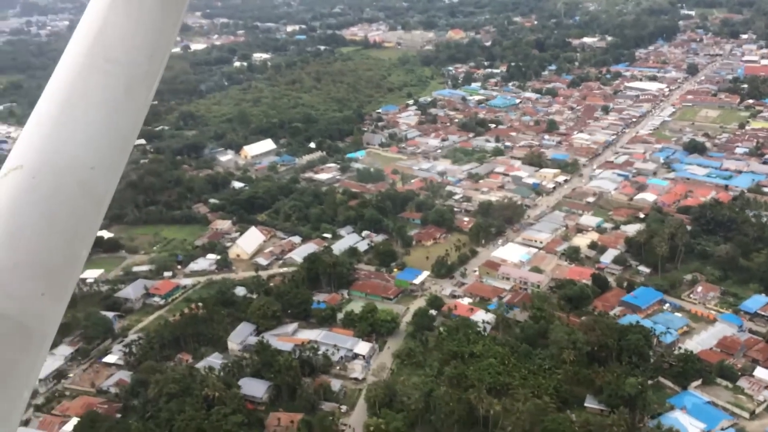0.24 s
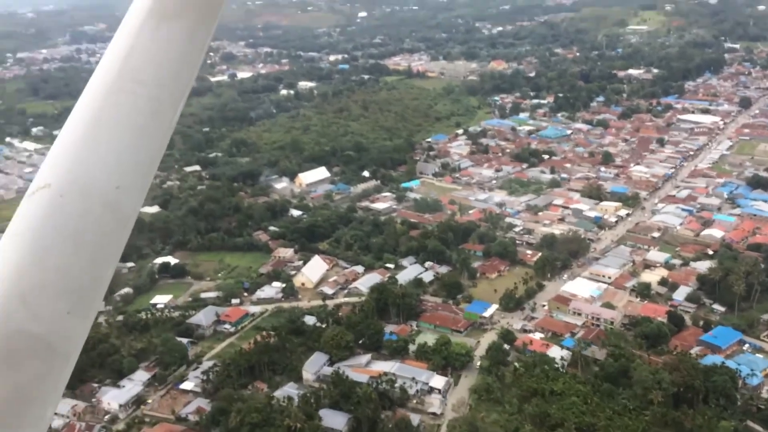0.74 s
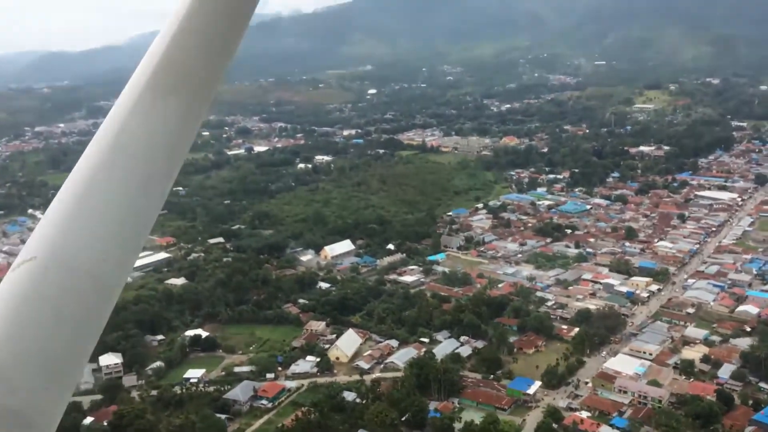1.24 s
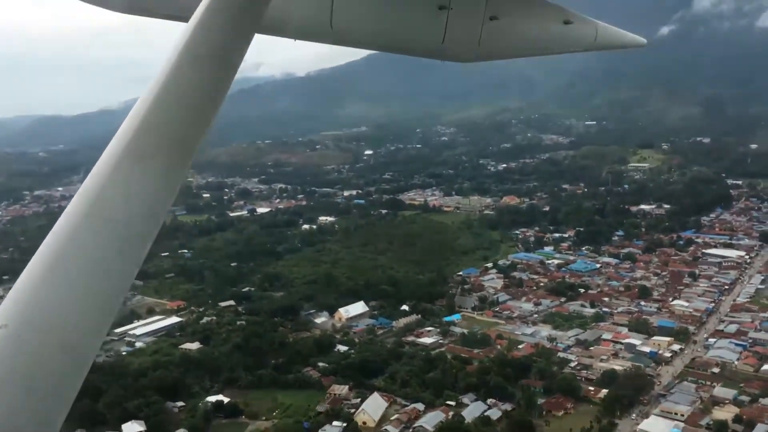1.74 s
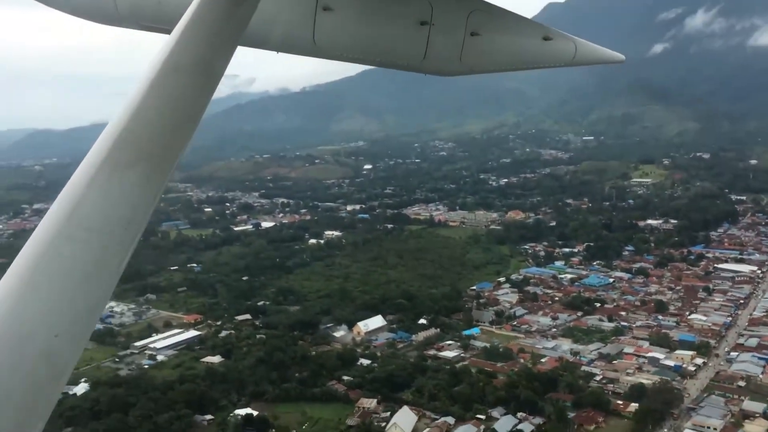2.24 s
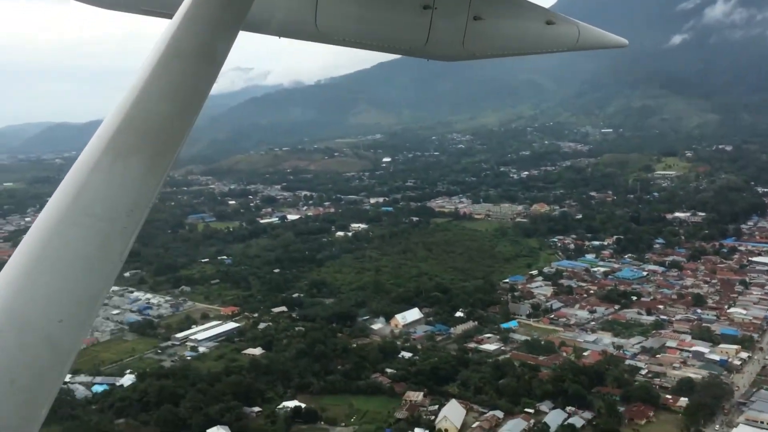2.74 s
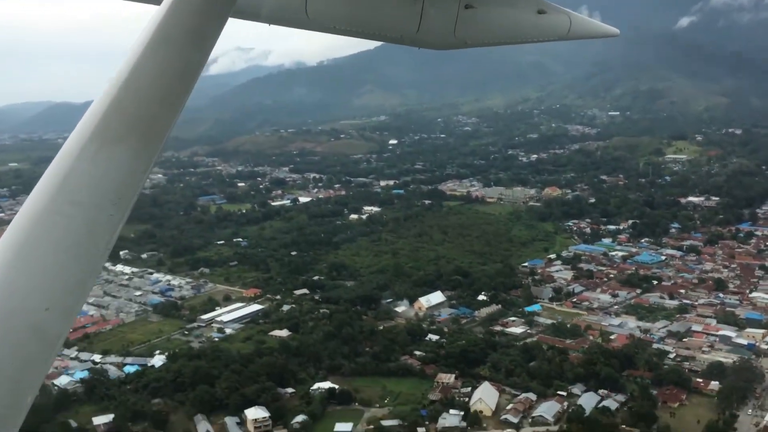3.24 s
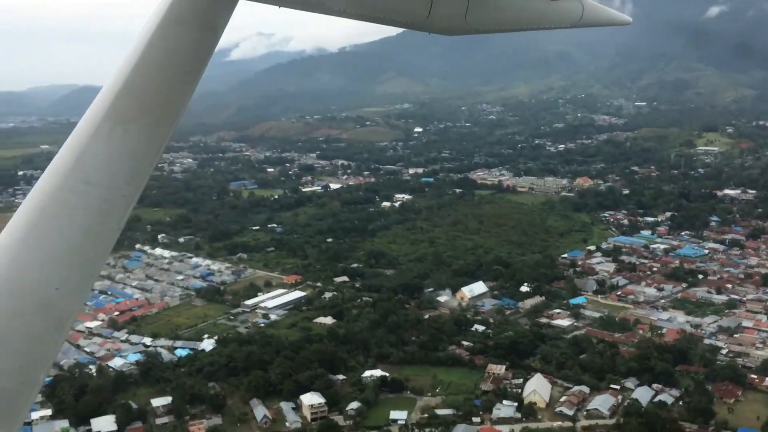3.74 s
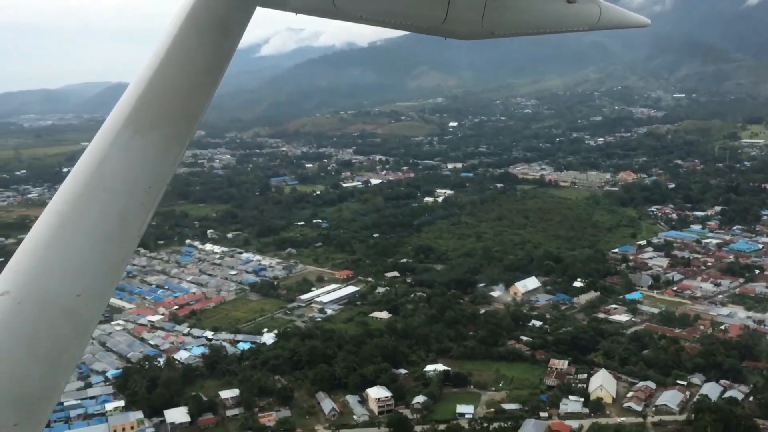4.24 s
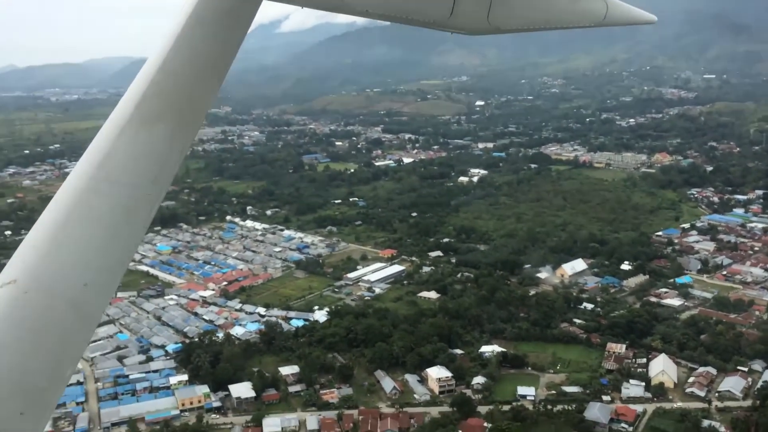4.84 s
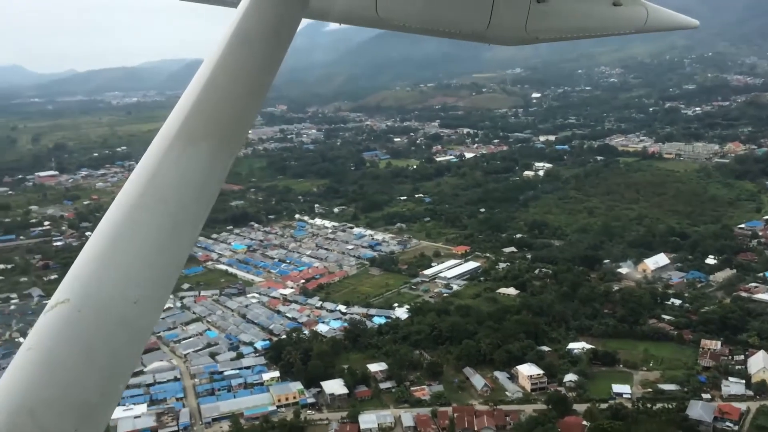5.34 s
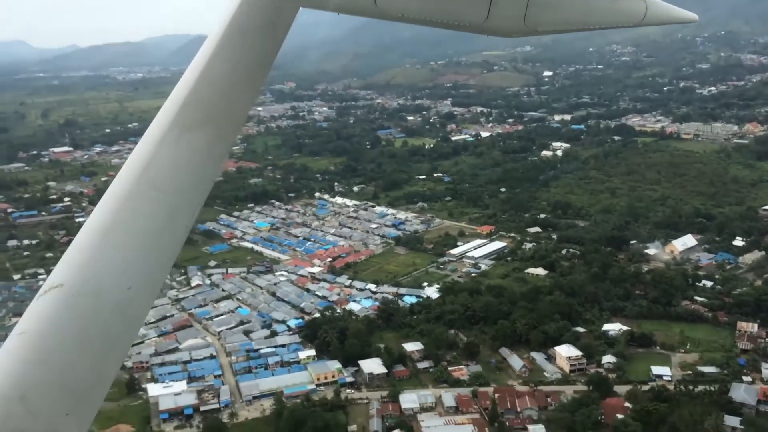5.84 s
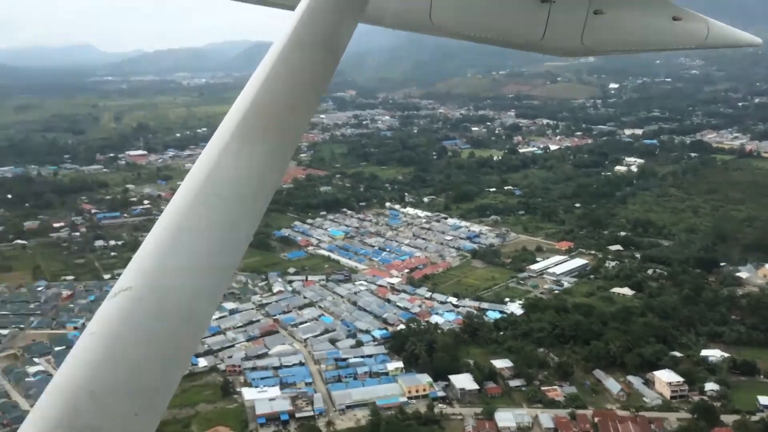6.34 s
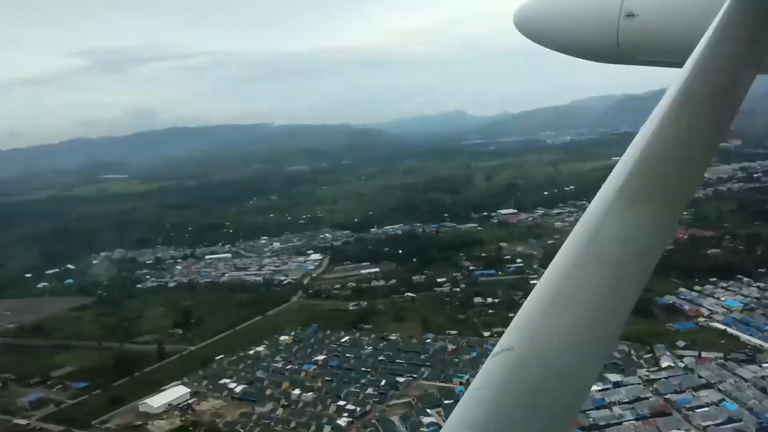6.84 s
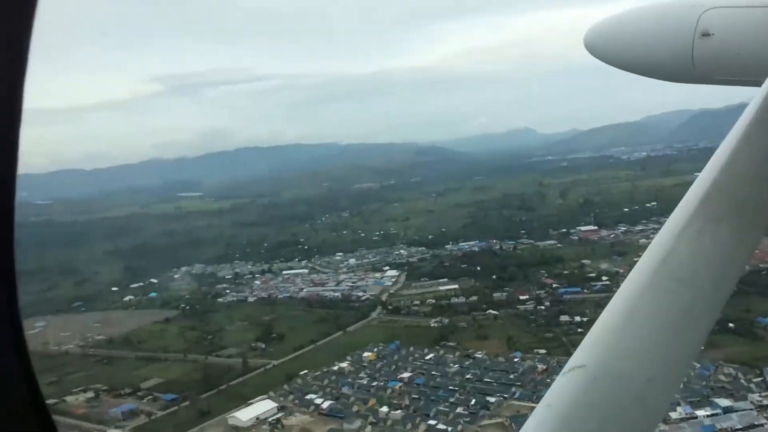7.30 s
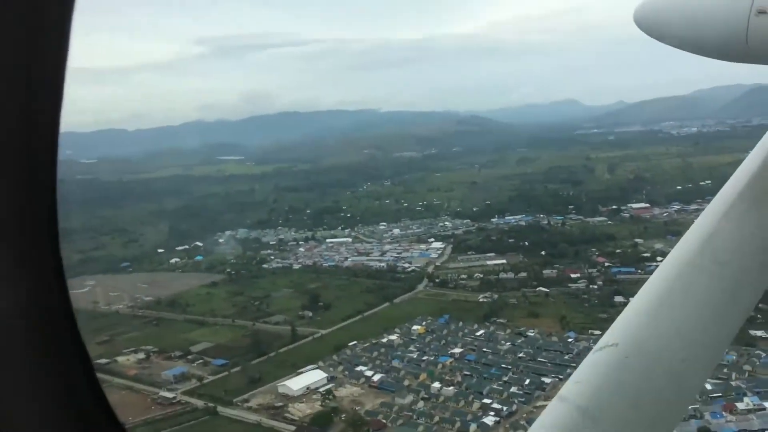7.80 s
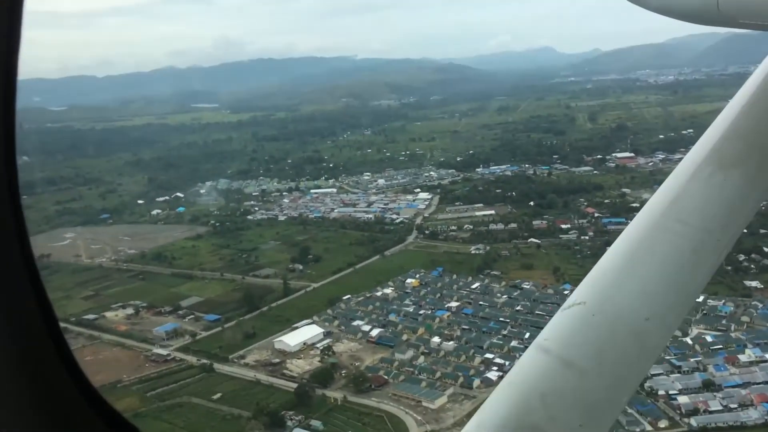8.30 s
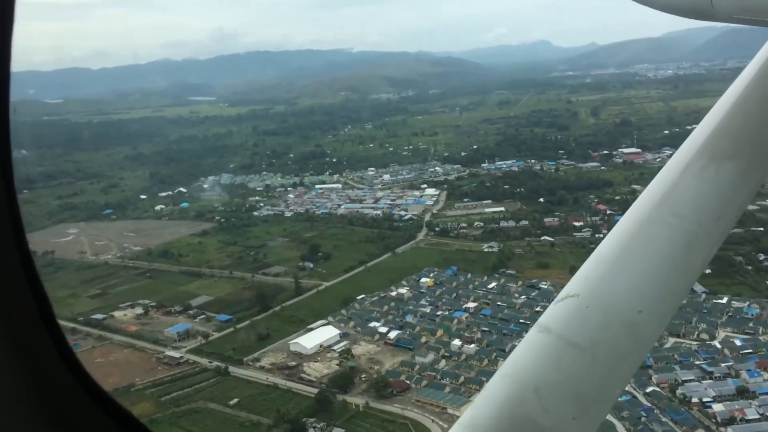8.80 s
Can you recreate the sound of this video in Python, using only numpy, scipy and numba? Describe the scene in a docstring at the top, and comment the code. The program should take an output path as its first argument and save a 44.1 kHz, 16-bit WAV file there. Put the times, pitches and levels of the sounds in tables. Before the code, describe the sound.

The cabin of a small turboprop in flight, loud and continuous from the first instant to the end at about 9 s. A deep propeller drone dominates, strongest near 100 and 200 Hz, with weaker tones around it making a rough, fluttering throb at nearly constant pitch. Dense slipstream roar fills the space, heavy in the bass and softer above. A wavering hum near 330 Hz sits inside it, and a very thin whine near 9.5 kHz flickers in and out. The 200 Hz note dips around 3, 5.3 and 8 s; the lowest strong tone eases between 4.3 and 5.5 s, with a slight swell of air noise at 5.4 s. From 5.7 s the hum fades. Around 6.6 s the phone turns forward: the roar grows brighter, and a faint narrow hiss near 8 kHz enters, slipping lower at 7.6 s. Close mono phone sound, peaks limited.

```python
"""A three-blade propeller drones in a turboprop cabin: sines on multiples of a nearly steady shaft rate.
Slipstream roars through the wall as noise shaped by resonances, and its colour changes as the phone,
held at a side window, turns mostly forward late on. A hum wanders near the tenth order and fades, a turbine
whine flickers high up, and a narrow band of hiss sings late on. The phone's limiter catches the peaks."""
import sys
import numpy as np
from scipy import signal
from scipy.fft import rfft, irfft, next_fast_len
from scipy.io import wavfile
from scipy.ndimage import uniform_filter1d, minimum_filter1d
from numba import njit

SR = 44100
rng = np.random.default_rng(int(sys.argv[2]) if len(sys.argv) > 2 else 0)


def wav_out(sig):
    """Save sig, one row per channel (or a flat mono array), as 16-bit PCM at SR to the path in sys.argv[1]."""
    wavfile.write(sys.argv[1], SR, np.round(np.clip(np.atleast_2d(sig).T, -1, 1) * 32767).astype(np.int16))


N = 399546
TIME_S = np.arange(N) / SR

# All levels are ahead of the phone's drive and limiter; tones are rms.
# slipstream colour through the cabin wall, before lifts and dips: [f/Hz, density/dB per Hz]
WALL_COLOUR = [(15, -71), (30, -50), (62, -37.5), (100, -33), (170, -34), (260, -41.5), (400, -50.5),
               (550, -59), (900, -61), (2100, -71.5), (2900, -76), (5000, -83.5), (9000, -89.5),
               (13300, -91), (15200, -96)]
# parts of the roar that flicker separately: [from f/Hz, to f/Hz]
ROAR_REGIONS = [(0, 450), (450, 1500), (1500, 4500), (4500, 8000), (8000, 22050)]
# panel and window resonances, cancellations between them, and near 9500 Hz the hiss around the whine,
# facing aft: [f/Hz, width at half lift/Hz, lift/dB]
AFT_BUMPS = [(196.7, 21, 4.5), (298, 24, 3.5), (348, 22, 3), (675, 208, 8), (924, 58, -3.5), (1061, 140, 7),
             (1384, 214, 3.5), (1790, 350, 10.5), (2427, 310, 9), (3060, 94, 6.5), (3240, 120, 3.5),
             (3530, 264, 10), (4060, 350, 4.5), (4740, 100, 6.5), (5300, 990, 2), (6900, 250, -2),
             (8600, 500, 2), (9500, 130, 3.5), (9540, 500, 5.5)]
# the same, facing forward: [f/Hz, width at half lift/Hz, lift/dB]
FORWARD_BUMPS = [(133, 31, 0), (199, 39, 5), (299, 40, 4.5), (330, 34, 3), (673, 270, 8), (1066, 150, 7.5),
                 (1382, 134, 8), (1747, 310, 7), (2230, 110, 8), (2515, 310, 8.5), (2780, 100, -6),
                 (3050, 140, 3.5), (3430, 340, 8.5), (4040, 500, 1.5), (5100, 300, 3), (5350, 250, -5),
                 (5940, 540, 4), (6600, 490, 4.5), (7330, 600, 6.5), (8440, 1200, 6), (9500, 130, 1),
                 (9540, 500, 7), (10400, 1800, 4.5)]
# the phone swings round: [t/s, share facing forward/0-1]
PHONE_TURN = [(0, .1), (2.4, 0.07), (5.2, 0), (6.3, .08), (6.55, .3), (6.75, 0.8), (9.06, 0.82)]
# turbine whine, before flicker: [t/s, level/dB]
WHINE_LEVEL = [(0, -52), (.75, -58), (1.5, -54), (3.3, -56), (4.3, -52), (4.9, -53), (5.5, -68), (5.8, -62),
               (6.5, -54), (6.85, -61), (7.55, -52), (8.3, -63), (8.8, -55), (9.06, -61)]
# blade-rate orders either side of the phone's shift, before flicker:
# [shaft order, level before/dB, level after/dB]
BLADE_LINES = [(3, -15.5, -20), (12, -34.5, -32), (18, -42.5, -38.5)]
# other shaft orders, with the third blade harmonic (9), before flicker:
# [shaft order, level before/dB, level after/dB]
OTHER_SHAFT_LINES = [(2, -24, -22.5), (4, -24, -21), (5, -30, -30), (7, -29.5, -30.5), (9, -35.5, -30)]
# the sixth order swells and cancels on its own, before flicker: [t/s, level/dB]
SIXTH_ORDER_LEVEL = [(0, -13.5), (.8, -13.5), (1.4, -18.5), (2.6, -16), (3.05, -25), (3.8, -15.5),
                     (4.9, -18.5), (5.3, -32), (6.5, -16.5), (8.0, -25), (9.06, -16)]

# roar above the bass: trim, and one bell-shaped swell (length from its peak to 1/e of the lift)
UPPER_ROAR_DB, SWELL_S, SWELL_LENGTH_S, SWELL_DB = 0.47, 5.36, 0.29, 0.9
# singing hiss: level once risen, entry, and one slide down in pitch
SING_DB, SING_FROM_S, SING_RISE_S, SING_WIDTH_HZ = -56.5, 6.6, .4, 350
SING_HIGH_HZ, SING_LOW_HZ, SING_SLIDE_S, SING_SLIDE_LENGTH_S = 8030, 7450, 7.6, .3
# wanders are rms spreads of the slow pitch drift
WHINE_HZ, WHINE_WANDER_HZ = 9498.8, 1.7
HUM_HZ, HUM_WANDER_HZ = 332.2, 1.1
HUM_DB, HUM_FADE_FROM_S, HUM_FADE_DB_PER_S = -22, 5.7, 1.2
# the phone shifts within the cabin's standing waves, centred on SHIFT_S
SHAFT_HZ, SHIFT_S, SHIFT_LENGTH_S = 33.236, 4.94, 1.2
# phone: input drive, limiter and top cut
DRIVE_DB, LOOK_S, CEILING, RELEASE_S, TOP_HZ = 1.5, 0.0033, .9985, .018, 15250


def undb(db):
    """Decibels to amplitude gain."""
    return 10 ** (np.asarray(db) / 20)


def over_time(table):
    """The second column of a timed table, joined by straight lines."""
    s, value = np.transpose(table)
    return np.interp(TIME_S, s, value)


def ramp(start_s, length_s):
    """Rises in a straight line from 0 to 1 over length_s from start_s."""
    return np.clip((TIME_S - start_s) / length_s, 0, 1)


def walk(rate):
    """Random levels, rate of them a second, smoothed twice and scaled to a spread of 1."""
    hold = int(SR / rate)
    steps = np.repeat(rng.standard_normal(N // hold + 1), hold)
    smooth = uniform_filter1d(uniform_filter1d(steps, hold), hold)[:N]
    return smooth / np.std(smooth)


def flutter(rate):
    """A quick random walk with its slow drift taken out."""
    w = walk(rate)
    return w - uniform_filter1d(w, int(5 * SR / rate))


def tone(hz, db):
    """A sine of rms level db that follows hz from a random phase."""
    turns = np.cumsum(hz * np.ones(N)) / SR + rng.random()
    return np.sqrt(2) * undb(db) * np.sin(2 * np.pi * turns)


def roar_colour(hz, bumps):
    """Spectral gain of the wall, with bell-shaped lifts and dips added in decibels."""
    f, density_db = np.transpose(WALL_COLOUR)
    colour_db = np.interp(np.log(hz + 1), np.log(f), density_db)  # the 1 avoids log of zero
    for centre_hz, width_hz, lift_db in bumps:
        colour_db = colour_db + lift_db * np.exp(-np.log(16) * ((hz - centre_hz) / width_hz) ** 2)
    return undb(colour_db)


def slipstream():
    """Turbulence as coloured noise, heard through the wall; turning the phone blends two colours of it."""
    size = next_fast_len(N)
    hz = np.fft.rfftfreq(size, 1 / SR)
    white = rfft(rng.standard_normal(size)) * np.sqrt(SR / 2)  # unit power per Hz
    aft_spectrum = white * roar_colour(hz, AFT_BUMPS)
    forward_spectrum = white * roar_colour(hz, FORWARD_BUMPS)
    facing_forward = np.clip(over_time(PHONE_TURN), 0, 1)
    swell = np.exp(-((TIME_S - SWELL_S) / SWELL_LENGTH_S) ** 2)
    upper_db = UPPER_ROAR_DB + SWELL_DB * swell
    roar = np.zeros(N)
    for lo_hz, hi_hz in ROAR_REGIONS:
        region = (hz >= lo_hz) * (hz < hi_hz)
        aft = irfft(aft_spectrum * region, size)[:N]
        forward = irfft(forward_spectrum * region, size)[:N]
        # each region flickers on its own; the bass buffets harder
        if lo_hz:
            level_db = upper_db + 0.86 * flutter(30)
        else:
            level_db = 1.6 * flutter(24)
        roar += undb(level_db) * (aft + facing_forward * (forward - aft))
    return roar


def singing():
    """Low-passed noise multiplied by a sliding sine makes a narrow band of hiss around its pitch."""
    hz = SING_HIGH_HZ + (SING_LOW_HZ - SING_HIGH_HZ) * ramp(SING_SLIDE_S, SING_SLIDE_LENGTH_S)
    # the carrier mirrors the low band to both sides, doubling its width
    lowpass = signal.butter(2, SING_WIDTH_HZ / 2, fs=SR, output="sos")
    noise = signal.sosfilt(lowpass, rng.standard_normal(N))
    return noise / np.std(noise) * tone(hz, SING_DB) * ramp(SING_FROM_S, SING_RISE_S)


def whine():
    """Turbine blade tone, a wandering sine that flickers as it arrives by many paths."""
    hz = WHINE_HZ + WHINE_WANDER_HZ * walk(1.8) + 1.3 * walk(12)
    return tone(hz, over_time(WHINE_LEVEL) + 2.0 * flutter(25))


def hum():
    """A sine not locked to the shaft, unsteady in pitch and level, that fades late on."""
    hz = HUM_HZ + HUM_WANDER_HZ * walk(2.5) + .59 * walk(9)
    fade_db = HUM_FADE_DB_PER_S * np.maximum(TIME_S - HUM_FADE_FROM_S, 0)
    return tone(hz, HUM_DB - fade_db + 1.25 * walk(6))


def shaft_line(shaft_hz, order, level_db, flicker_rate):
    """One multiple of the shaft rate, its level flickering on its own."""
    return tone(round(order) * shaft_hz, level_db + 1.9 * flutter(flicker_rate))


def propeller():
    """Blade and other orders share one shaft rate, wavering as the blades cut uneven air."""
    shaft_hz = SHAFT_HZ * (1 + .0004 * walk(.5))
    shifted = ramp(SHIFT_S - SHIFT_LENGTH_S / 2, SHIFT_LENGTH_S)
    drone = shaft_line(shaft_hz, 6, over_time(SIXTH_ORDER_LEVEL), 14)
    for table, flicker_rate in ((BLADE_LINES, 14), (OTHER_SHAFT_LINES, 9)):
        for order, before_db, after_db in table:
            level_db = before_db + (after_db - before_db) * shifted
            drone += shaft_line(shaft_hz, order, level_db, flicker_rate)
    return drone


def scene():
    """Everything in the cabin, mixed to one channel."""
    return (slipstream() + singing() + whine() + hum() + propeller())[None]


@njit
def recover(need, release):
    """Limiter gain drops at once to what is needed and creeps back towards 1."""
    gain, g = np.empty(len(need)), 1.
    for i in range(len(need)):
        g = min(need[i], g + (1 - g) * release)
        gain[i] = g
    return gain


def record(dry):
    """The phone: a look-ahead limiter holds peaks under the ceiling, then the top is cut."""
    driven = dry[0] * undb(DRIVE_DB)
    look = int(LOOK_S * SR)
    peak_gain = np.minimum(1, CEILING / (np.abs(driven) + 1e-9))
    need = minimum_filter1d(peak_gain, 2 * look + 1)
    gain = uniform_filter1d(recover(need, 1 / (RELEASE_S * SR)), look)
    held = driven * gain
    top_cut = signal.ellip(16, .02, 70, TOP_HZ, fs=SR, output="sos")
    # the filter is already settled when the sound begins
    settled = signal.sosfilt_zi(top_cut) * held[0]
    return signal.sosfilt(top_cut, held, zi=settled)[0][None]


dry = scene()
out = record(dry)
wav_out(out)
```